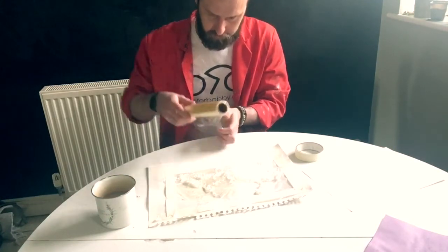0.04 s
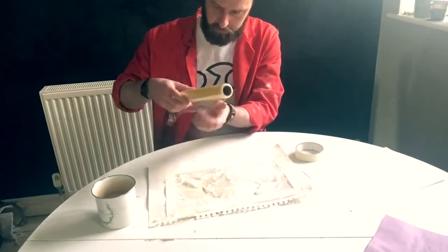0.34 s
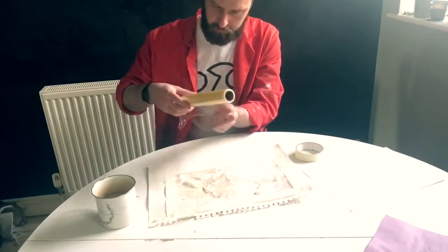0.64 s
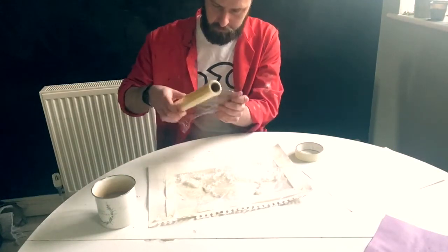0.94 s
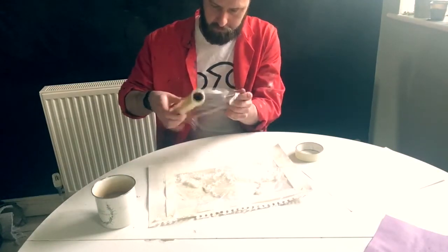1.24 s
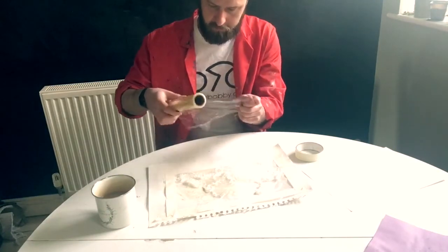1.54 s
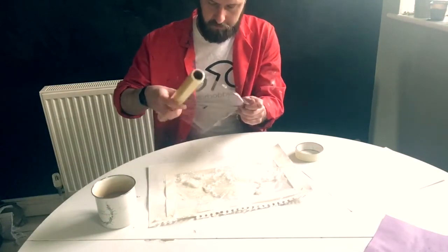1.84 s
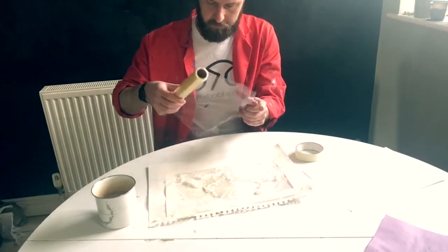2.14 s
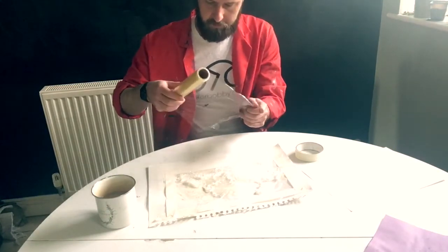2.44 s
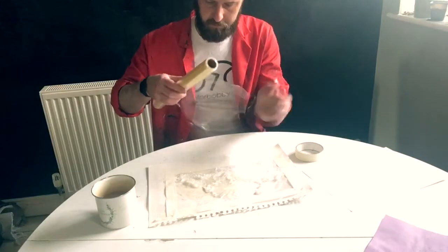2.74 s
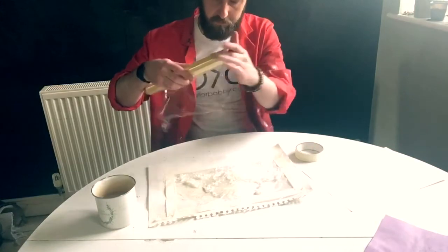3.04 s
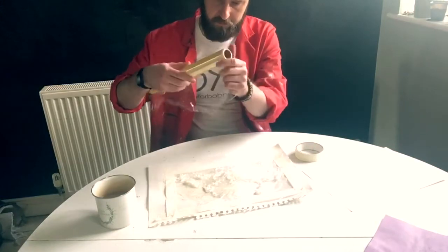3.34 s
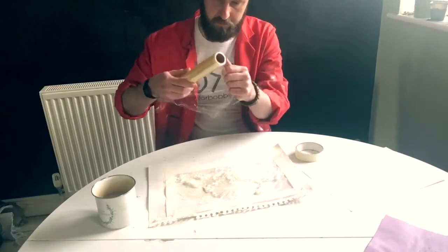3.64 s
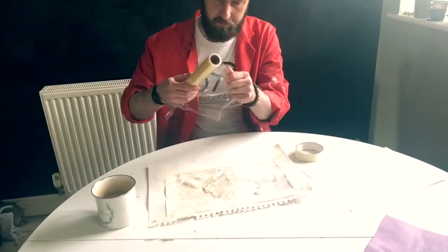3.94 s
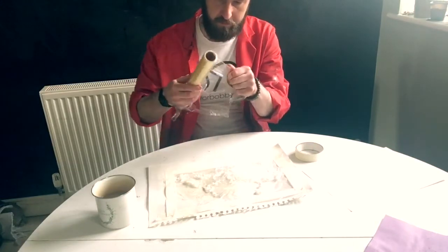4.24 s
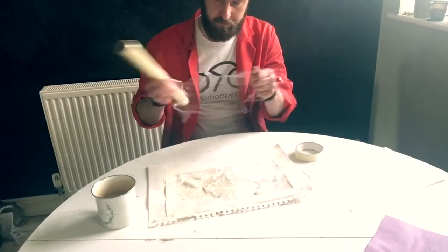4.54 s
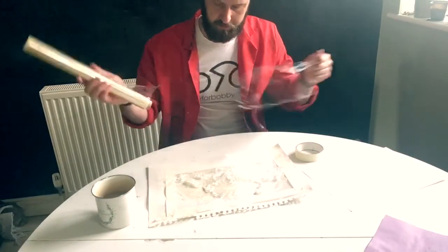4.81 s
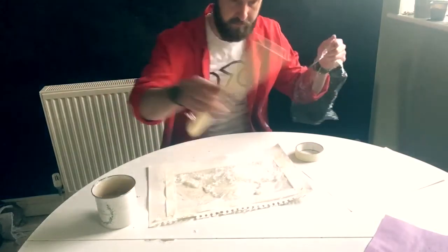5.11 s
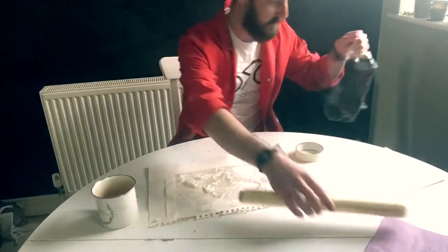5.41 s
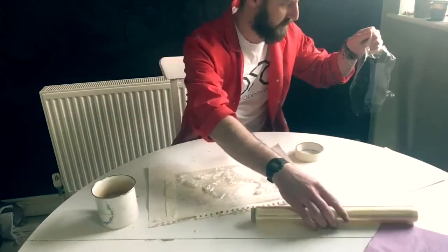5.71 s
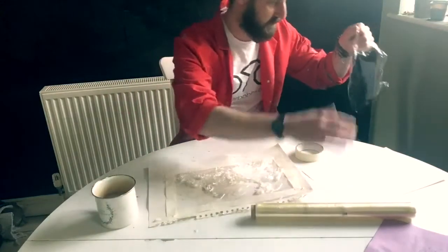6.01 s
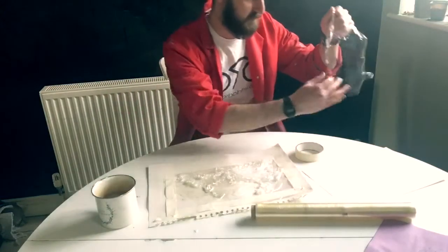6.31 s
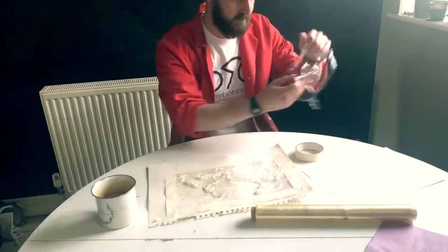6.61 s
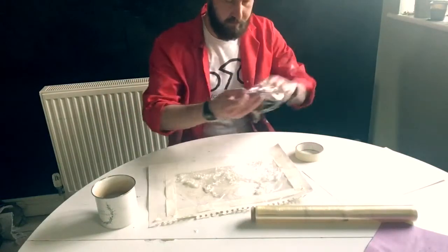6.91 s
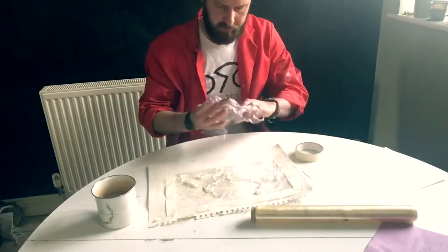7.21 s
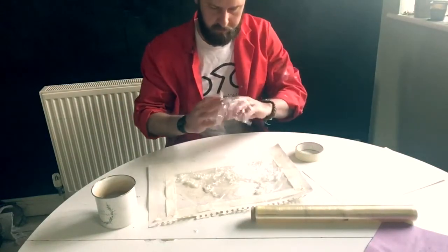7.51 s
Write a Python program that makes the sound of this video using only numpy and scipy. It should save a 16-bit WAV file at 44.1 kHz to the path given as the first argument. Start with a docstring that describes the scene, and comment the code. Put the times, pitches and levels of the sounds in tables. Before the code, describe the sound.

Cling film is picked loose and peeled from a cardboard roll in faint crackles and short rustles, with hands rubbing on the tube. It tears free with a sharp snap. The roll is then put down on a table, knocking and rattling briefly as the top rings, and the film is softly crumpled. The microphone is close, in a quiet kitchen with hard walls and a fridge humming behind.

```python
"""A table in a bare kitchen, one microphone close to the hands; a fridge hums behind throughout.
Cling film is picked loose and peeled off a cardboard roll in tiny slips, then torn free with a snap
at 4.2 s. At 5.4 s the roll is laid down, one end first, and rattles to rest on the ringing table top.
From 6.3 s the film is crumpled, buckling in flurries of creases.
The hard walls ring for half a second after each sound."""
import sys
import numpy as np
from scipy import signal
from scipy.fft import rfft, irfft
from scipy.io import wavfile
from scipy.ndimage import uniform_filter1d

SR = 44100
rng = np.random.default_rng(int(sys.argv[2]) if len(sys.argv) > 2 else 0)


def dump_mix(stems):
    """Bounce the given channels to the path in sys.argv[1] as a 16-bit WAV at rate SR."""
    frames = np.atleast_2d(stems).T  # one column per channel
    limited = np.clip(frames, -1, 1)  # hard clip at full scale
    pcm = np.round(limited * 32767).astype(np.int16)
    wavfile.write(sys.argv[1], SR, pcm)


N = 333263
TIME = np.arange(N) / SR

# Levels are relative within each table.
# still air in the kitchen: (frequency [Hz], level [dB])
ROOM_TONE = [(15, -42), (25, -16.5), (43, -17.5), (69, -13), (91, -8), (110, -11), (126, -13.5),
             (233, -12.5), (289, -11.5), (378, -8), (421, -16), (631, -22.5), (1900, -32), (6920, -39.5),
             (14500, -41.5), (16000, -50.5)]
# ring of the hard walls: (frequency [Hz], time to fall 60 dB [s])
WALL_DECAY = [(100, 0.56), (400, 0.44), (1200, 0.48), (4000, 0.43), (9000, 0.4), (15000, 0.39)]
# skin and sleeves sliding over the roll: (peak time [s], level [dB], length [s])
HAND_RUBS = [(0, -63.5, .07), (.19, -62, 0.12), (.77, -61, 0.086), (.95, -70, 0.08), (1.17, -64, 0.17),
             (1.6, -77, .25), (2.06, -75, 0.063), (2.86, -73, 0.37), (3.29, -57, 0.057), (3.73, -75.5, .12),
             (3.98, -69, 0.026), (5.05, -64, 0.089), (5.35, -73.5, .1), (6.4, -72.5, 0.38),
             (6.68, -64.5, .06), (7.47, -72.5, .16)]
# the roll slipping in the fingers: (time [s], level [dB], decay time [ms])
FINGER_SLIPS = [(4.819, -62, 15), (4.9773, -50, 11.6), (5.013, -64, 18)]
# tone of skin on cardboard: (frequency [Hz], level [dB])
RUB_COLOUR = [(60, -11), (180, -6), (400, 9.5), (800, 0.5), (1500, -1), (3000, -9), (6000, -17),
              (16000, -36)]
# the roll striking the table: (time [s], level [dB], contact time [ms])
ROLL_KNOCKS = [(5.4272, -47.5, 0.079), (5.4277, -22, 1.38), (5.437, -26, 3.6), (5.4423, -27.5, 1.63),
               (5.453, -27, 2.2), (5.537, -55.5, 0.044), (5.5397, -28, 0.92), (5.5504, -32.5, 0.4),
               (5.5553, -24, 0.8), (5.5632, -27.5, 1), (5.5703, -36.5, 1.1), (5.578, -27.5, 2.66),
               (5.59, -29, 1.56), (5.6015, -29, 1.37), (5.6555, -42, 1.8), (5.7109, -51, 0.56)]
# table top with the roll on it: (frequency [Hz], level [dB], time to fall 60 dB [s])
TABLE_TOP_MODES = [(71, -16, 0.57), (143.6, 1, 0.37), (194, 1.5, 0.1), (221.6, 3.5, 0.27), (245, 2, 0.05),
                   (266, 5, 0.1), (297.3, 5, 0.54), (346, 6, 0.12), (403.2, -3, 0.24), (442, -4, 0.32),
                   (484, -19, 0.34), (539, -3, 0.39), (592, -15, 0.031), (637, -4.2, 0.18), (664, 1, 0.42),
                   (680, -3.5, 0.37), (865, -11.5, 0.45), (1119, -0.5, 0.22), (1227, -0.5, 0.14),
                   (1278, -7, 0.36), (1363, -3, 0.14), (1447, 0, 0.11), (1765, -6, 0.13)]
# tone of a knock on the table: (frequency [Hz], level [dB])
THUD_COLOUR = [(40, -53), (120, -13), (170, -15), (250, 3), (450, 0.5), (700, 4), (960, -6.5), (1300, -1),
               (1580, -7), (1850, -5), (2300, -10), (3000, -13), (3900, -13.5), (5500, -27), (15000, -28.5)]
# something small shaken on the table: (frequency [Hz], level [dB], time to fall 60 dB [s])
TINKLE_MODES = [(8560, 1, 0.29), (8790, -2, .25)]
# the hollow roll jolted by the film: (time [s], level [dB])
ROLL_JOLTS = [(.574, -54), (1.759, -59.5), (2.539, -61.5), (2.57, -61.5), (4.2017, -41)]
# cardboard tube and its air column: (frequency [Hz], level [dB], time to fall 60 dB [s])
ROLL_MODES = [(184, -14, 0.23), (295, -8.5, 0.38), (339, -7.5, 0.26), (402, 5, 0.075), (485, 5, 0.058),
              (503, -9, 0.19), (581, -11, 0.31), (648.6, -9, 0.16), (1265, -9, 0.027)]
# film drawn off the roll: (start [s], length [s], level [dB], change with tension [dB/s])
FILM_PULLS = [(1.052, 0.078, -56.5, 48), (3.275, 0.098, -55.5, 25), (4.456, 0.156, -56, -28)]
# loose film squeezed or shaken: (peak time [s], level [dB], length [s])
CREASE_FLURRIES = [(.02, -70.5, 0.17), (.19, -64.5, 0.15), (.36, -67.5, .1), (.45, -65.5, .08),
                   (.77, -65.5, 0.35), (.94, -63, 0.073), (1.24, -61.5, 0.16), (1.63, -79, .1),
                   (2.108, -61, 0.034), (2.8, -74, 0.56), (3.235, -57, 0.084), (3.77, -70.5, 0.12),
                   (3.872, -62, 0.044), (3.98, -64, .05), (4.84, -69.5, 0.13), (5.13, -70, 0.28),
                   (5.4, -78, .06), (6.32, -73.5, 0.14), (6.46, -68, 0.2), (6.68, -62.5, 0.15),
                   (6.81, -67, 0.45), (7.1, -61, 0.096), (7.2, -63, 0.27), (7.335, -60, 0.077),
                   (7.44, -58, 0.13), (7.5, -62, .08)]
# tone of peeling and creasing film: (frequency [Hz], level [dB])
CRINKLE_COLOUR = [(200, -19), (1000, -7), (2800, 0.5), (5000, -0.5), (9000, 0), (13500, 2.5), (16000, -3)]
# film letting go: (time [s], level [dB], decay time [ms], sheet resonance [Hz], its boost [dB])
FILM_CRACKLES = [(0.5685, -50.5, 11, 13000, 7), (0.5797, -52, 3.4, 2130, 13), (1.037, -54, 1.9, 2320, 10),
                 (1.047, -53.5, 5.9, 12500, 8), (1.108, -51, 3.4, 12400, 13), (1.127, -50.5, 10, 2410, 5),
                 (1.3758, -60, 2.5, 2700, 8), (1.747, -59.5, 8.8, 2600, 15), (1.759, -59, 4, 2720, 2),
                 (1.9265, -62.5, 3.9, 12000, 2), (2.082, -68, 4, 2700, 9), (2.1125, -59.5, 2, 9450, 7),
                 (2.334, -74.5, 5, 13000, 6), (2.5358, -51, 2.9, 2800, 10.5), (2.568, -51.5, 10, 2870, 6.5),
                 (3.368, -52.5, 11, 3070, 8.5), (3.498, -54.5, 2.1, 3070, 4.5), (3.8552, -63, 2.6, 5600, 4),
                 (3.932, -55.5, 3.9, 3060, 12.5), (3.936, -61.5, 4.9, 1510, 17),
                 (4.1783, -51, 4.7, 1300, 7), (4.2003, -30, 2, 1250, 2), (4.207, -47, 5, 1250, 9),
                 (4.22, -46, 15, 1200, 0), (4.258, -41, 4, 1200, 3), (4.2752, -44.5, 1.3, 5000, 3),
                 (4.623, -47, 0.17, 6900, 3.5), (6.7073, -57.5, 5.4, 12000, 9), (6.7825, -59, 5.4, 2480, 5),
                 (6.836, -54, 1.9, 12000, 6.5)]
# tone of snapping film: (frequency [Hz], level [dB])
SNAP_COLOUR = [(100, -43), (190, -16), (320, -1), (650, -1), (950, -2.5), (1250, -0.5), (2200, -5.5),
               (3300, -3), (4600, -3), (8000, -4), (13500, -3), (16000, -3)]


def undb(db):
    """Decibels to gain."""
    return 10 ** (np.asarray(db) / 20)


def unit(x):
    """Scale to rms 1."""
    return x / np.sqrt(np.mean(x ** 2))


def blow(x, db):
    """Scale a short sound so that its energy, spread over 10 ms, has this level."""
    return x * undb(db) * np.sqrt(.01 * SR / np.sum(x ** 2))


def add(out, s, x):
    """Mix x in from time s."""
    i = int(s * SR)
    out[i:i + len(x)] += x[:N - i]


def at(points, hz):
    """Read (frequency, value) points on a log-frequency axis."""
    f, value = np.transpose(points)
    return np.interp(np.log(hz + 1), np.log(f), value)


def ring(x, response):
    """Pass x through an impulse response."""
    return signal.fftconvolve(x, response)[:len(x)]


def causal(gain):
    """Minimum-phase spectrum with this gain at each frequency."""
    cepstrum = irfft(np.log(gain))
    half = len(cepstrum) // 2
    cepstrum[1:half] *= 2
    cepstrum[half + 1:] = 0
    return np.exp(rfft(cepstrum))


def colour(points, size=4096):
    """Causal response of unit energy with this spectrum."""
    gain = undb(at(points, np.fft.rfftfreq(size, 1 / SR)))
    response = irfft(causal(gain))
    return response / np.linalg.norm(response)


def modes(rows):
    """Unit-energy response of a body with damped modes; neighbouring modes swing opposite ways."""
    t = TIME[:SR]
    response = sum((-1) ** k * undb(db - 60 * t / t60) * np.cos(2 * np.pi * hz * t)
                   for k, (hz, db, t60) in enumerate(rows))
    return response / np.linalg.norm(response)


def band(hz, width_hz):
    """Noise in one narrow, steep-sided resonance."""
    detuning = 2 * (np.fft.rfftfreq(N, 1 / SR) - hz) / width_hz
    return unit(irfft(rfft(rng.standard_normal(N)) / (1 + detuning ** 4), N))


def waver(rate_hz):
    """Smooth random drift of rms 1."""
    hold = int(SR / rate_hz)
    steps = np.repeat(rng.standard_normal(N // hold + 1), hold)
    return unit(uniform_filter1d(steps, hold)[:N])


def grains(per_s, spread_db):
    """Tiny slips at random moments: many weak, a few strong."""
    size = undb(spread_db * np.minimum(rng.exponential(size=N), 4))
    return unit((rng.random(N) < per_s / SR) * size * rng.choice([-1, 1], N))


def slip_burst(decay_ms, per_s, rise=0.46, flatten=0.72, size=4096):
    """A swelling, dying run of micro-slips, so brief that the burst has hardly any pitch."""
    age = 1000 * TIME[:size] / decay_ms
    slips = (rng.random(size) < per_s / SR) * rng.standard_normal(size)
    spectrum = rfft(slips * (1 - np.exp(-age / rise)) * np.exp(-age))
    gain = np.abs(spectrum) + 1e-12
    return irfft(spectrum * causal(gain ** -flatten))


def swell_power(rows):
    """Power of hand movements that each swell and die away in a bell curve."""
    power = 0
    for s, db, length_s in rows:
        from_peak = (TIME - s) / (length_s / 2)
        power += undb(db) ** 2 * np.exp(-2 * np.minimum(from_peak ** 2, 20))
    return power


def pull_power(attack_s=0.057, release_s=0.022):
    """Power of the peeling: it catches, changes steadily with the tension and stops with the hand."""
    power = 0
    for s, length_s, db, db_per_s in FILM_PULLS:
        t = TIME - s
        outside = np.maximum(-t, 0) / attack_s + np.maximum(t - length_s, 0) / release_s
        fade_db = 20 * np.minimum(outside, 10)
        power += undb(db + db_per_s * np.clip(t, 0, length_s) - fade_db) ** 2
    return power


def fridge_and_air(mains_hz=50, settle_db_per_s=.5):
    """In the background a fridge hums at twice the mains rate and drones in two beating resonances."""
    hum = np.sqrt(2) * np.sin(2 * np.pi * 2 * mains_hz * TIME)
    drone_gain = undb(-63 - settle_db_per_s * TIME + 1.57 * waver(2.55))
    drone = drone_gain * (undb(-3) * band(369, 24) + undb(-4.5) * band(387.4, 16))
    rumble = undb(-71) * band(57, 18)
    air = unit(ring(rng.standard_normal(N), colour(ROOM_TONE)))
    hum *= undb(-63 + 0.34 * waver(1.9))
    air *= undb(-63.5 + 0.33 * waver(4.5))
    return hum + drone + rumble + air


def room(x, wet_db, build_s=0.00099, gap_s=0.0012):
    """Direct sound reaches the microphone first, then a dense tail off the walls, its treble shortest."""
    t, f = TIME[:SR], np.fft.rfftfreq(SR, 1 / SR)
    noise, tail = rfft(rng.standard_normal(SR)), 0
    edges = [0, *(SR / 2 ** np.arange(8, 0, -1))]
    for lo, hi in zip(edges, edges[1:]):
        octave = irfft(noise * (f >= lo) * (f < hi), SR)
        tail += octave * undb(-60 * t / at(WALL_DECAY, (lo + hi) / 2))
    tail *= 1 - np.exp(-np.maximum(t - gap_s, 0) / build_s)
    return x + undb(wet_db) * ring(x, tail / np.linalg.norm(tail))


def hands():
    """Skin and cloth slide over the roll, which also turns in the hand at every pull."""
    turning = undb(-10) ** 2 * pull_power()
    held = undb(-85) ** 2  # the hands are never quite still
    friction = unit(ring(grains(per_s=5000, spread_db=2.2), colour(RUB_COLOUR)))
    return undb(-5) * np.sqrt(swell_power(HAND_RUBS) + turning + held) * friction


def fingers():
    """Dry skin skids on cardboard as the grip changes."""
    skids = np.zeros(N)
    for s, db, decay_ms in FINGER_SLIPS:
        add(skids, s, blow(slip_burst(decay_ms, per_s=2300), db))
    return ring(skids, colour(RUB_COLOUR))


def roll_knocks(scuff_s=0.0043, lowest_hz=75):
    """Force of the roll landing: short pushes, each with a scuff of cardboard; the softer, the duller."""
    force, t = np.zeros(N), TIME[:SR // 20]
    for s, db, contact_ms in ROLL_KNOCKS:
        age = 1000 * t / contact_ms
        push = age * np.exp(-4 * age)
        add(force, s, blow(np.ones(1), db) * push / push.sum())
        scuff = rng.standard_normal(len(t)) * np.exp(-t / scuff_s)
        add(force, s, blow(scuff, db - 22) / contact_ms)
    # air slips round the table's edge, so the deepest bass does not radiate
    return signal.sosfilt(signal.butter(3, lowest_hz, "high", fs=SR, output="sos"), force)


def bending(x, lag_at_1khz_s=0.00098):
    """Low bending waves cross the table top more slowly than high ones, which spreads each blow."""
    f = np.fft.rfftfreq(N, 1 / SR)
    return irfft(rfft(x) * np.exp(-4j * np.pi * lag_at_1khz_s * np.sqrt(1000 * f)), N)


def table_top(force):
    """The struck table rings, thuds into the room and shakes something small that stands on it."""
    body = ring(force, modes(TABLE_TOP_MODES))
    thud = bending(ring(force, colour(THUD_COLOUR)))
    tinkle = ring(force, modes(TINKLE_MODES))
    return undb(4) * body + undb(-4) * room(thud, wet_db=2.5) + undb(-26) * tinkle


def roll_pops():
    """A sudden release of tension makes the hollow roll pop."""
    jolts = np.zeros(N)
    for s, db in ROLL_JOLTS:
        add(jolts, s, blow(np.ones(1), db))
    return ring(jolts, modes(ROLL_MODES))


def film_peel():
    """Stuck film parts from the roll in dense tiny slips."""
    slips = grains(per_s=3000, spread_db=3) * undb(1.8 * waver(90))
    return undb(-3) * np.sqrt(pull_power()) * unit(ring(slips, colour(CRINKLE_COLOUR)))


def film_creases():
    """Loose film buckles in flurries and rustles faintly while it is held."""
    buckles = grains(per_s=4300, spread_db=2.8) * undb(2 * waver(90))
    power = swell_power(CREASE_FLURRIES) + undb(-94) ** 2
    return undb(-5) * np.sqrt(power) * unit(ring(buckles, colour(CRINKLE_COLOUR)))


def film_crackles(sheet_q=2.3, tilt_db_per_octave=0.97, size=4096):
    """Stuck film lets go in bursts, the loudest the snap; the tauter the sheet, the higher it rings."""
    bursts, f = np.zeros(N), np.fft.rfftfreq(size, 1 / SR)
    octaves = np.log2(np.maximum(f, 400) / 5000)
    for s, db, decay_ms, sheet_hz, sheet_db in FILM_CRACKLES:
        sheet = 1 / (1 + (2 * sheet_q * (f / sheet_hz - 1)) ** 2)
        tone = causal(undb(tilt_db_per_octave * octaves + sheet_db * sheet))
        burst = irfft(rfft(slip_burst(decay_ms, per_s=20000)) * tone)
        add(bursts, s, blow(burst, db))
    return ring(bursts, colour(SNAP_COLOUR))


def scene():
    """Film, roll and table close to the microphone, the fridge behind, in mono."""
    force, pops = roll_knocks(), roll_pops()
    handling = film_peel() + film_creases() + hands() + film_crackles() + fingers()
    close = room(handling + undb(-2.5) * pops, wet_db=0.5)
    close += undb(-1) * pops  # the roll is heard more directly than the film
    return (close + table_top(force) + fridge_and_air())[None]


def record(dry, bass_hz=38, top_hz=15700):
    """The microphone loses the deepest bass and the recorder cuts the top."""
    thin = signal.sosfilt(signal.butter(3, bass_hz, "high", fs=SR, output="sos"), dry)
    return signal.sosfilt(signal.ellip(10, .2, 70, top_hz, fs=SR, output="sos"), thin)


dry = scene()
out = record(dry)
dump_mix(out)
```